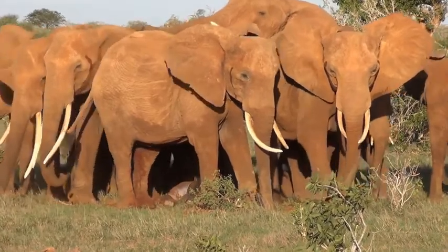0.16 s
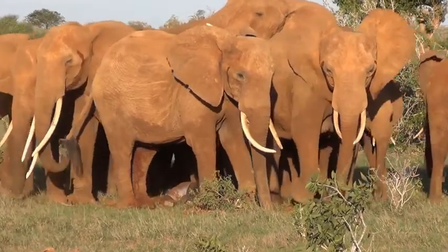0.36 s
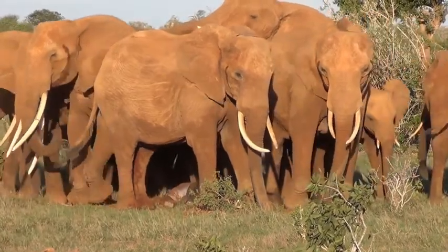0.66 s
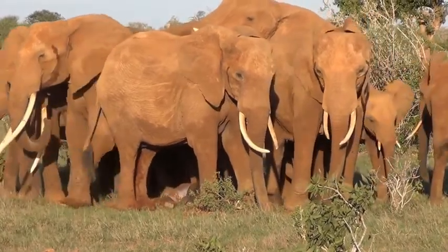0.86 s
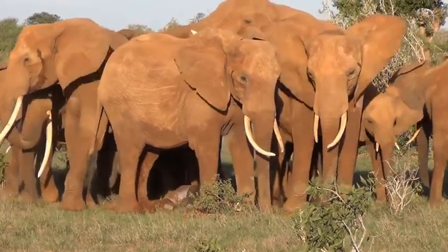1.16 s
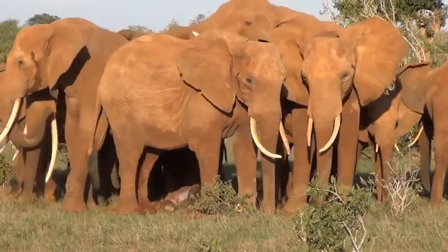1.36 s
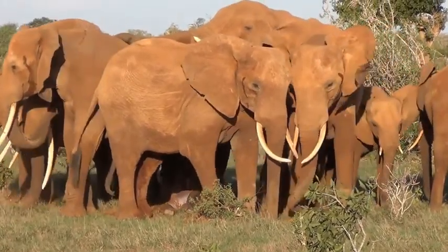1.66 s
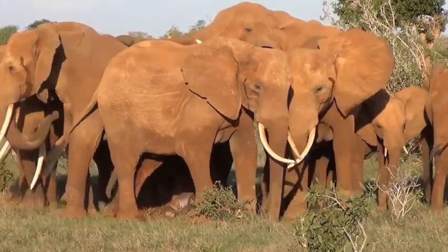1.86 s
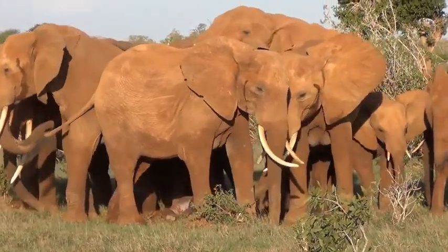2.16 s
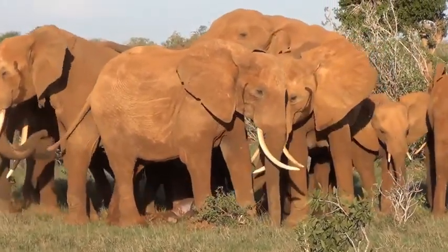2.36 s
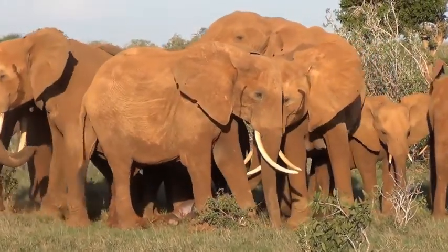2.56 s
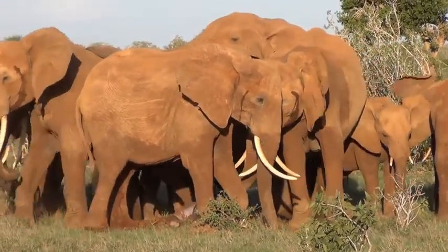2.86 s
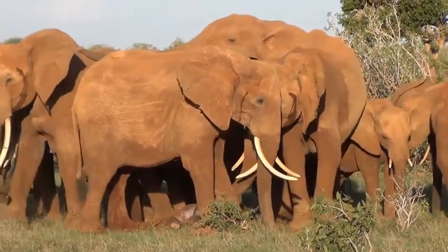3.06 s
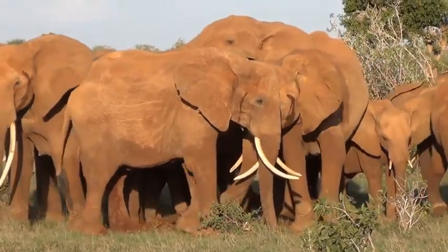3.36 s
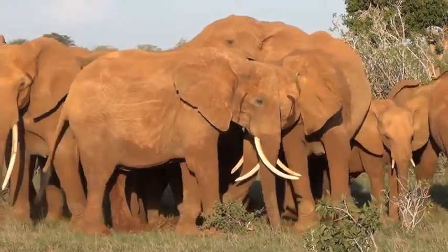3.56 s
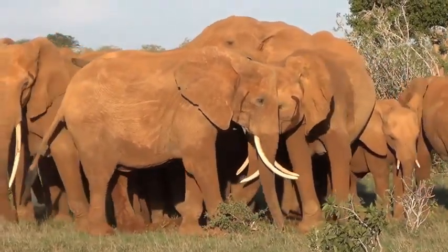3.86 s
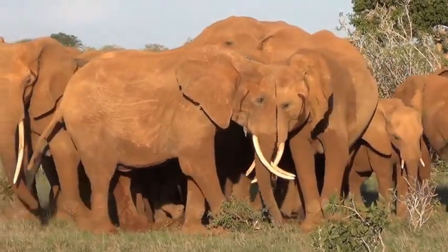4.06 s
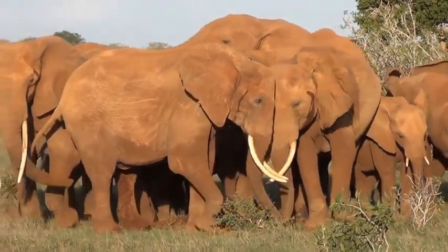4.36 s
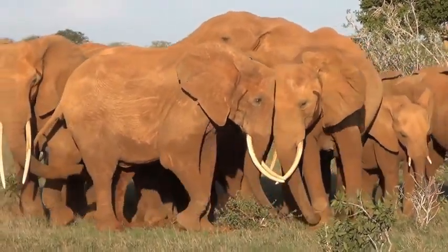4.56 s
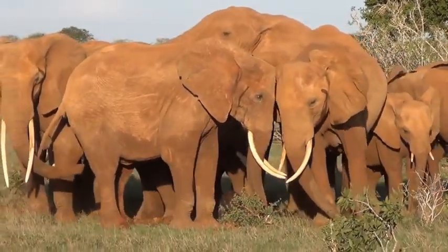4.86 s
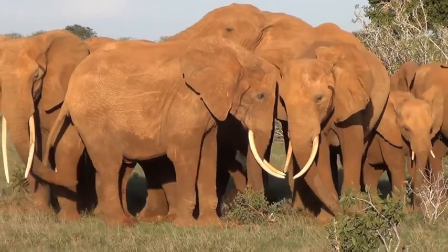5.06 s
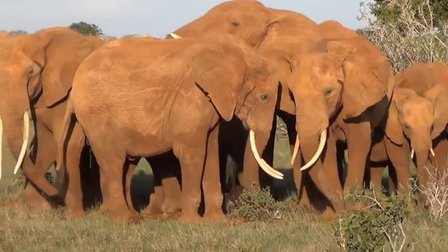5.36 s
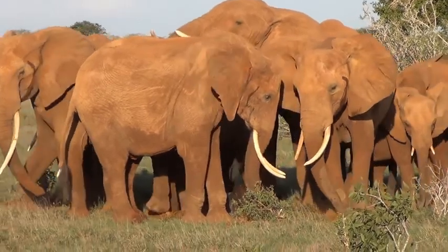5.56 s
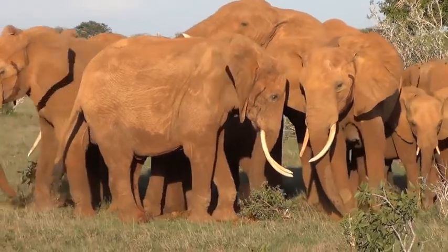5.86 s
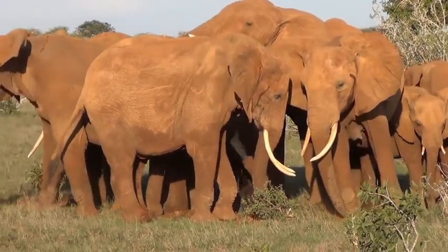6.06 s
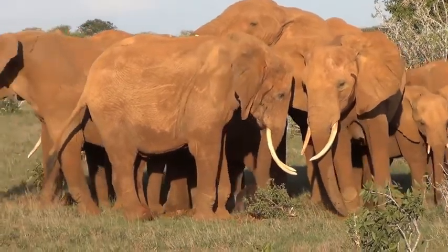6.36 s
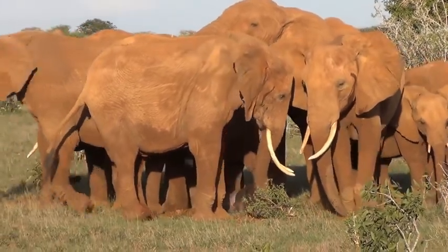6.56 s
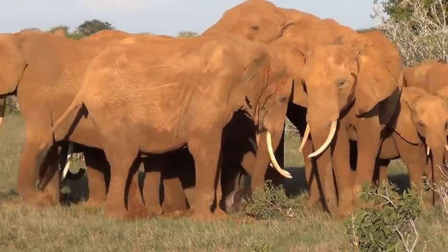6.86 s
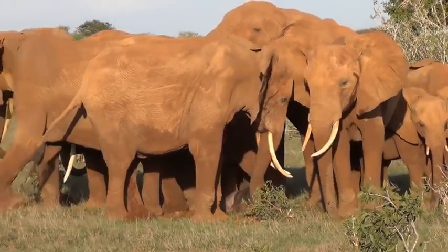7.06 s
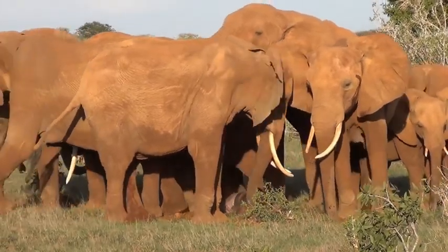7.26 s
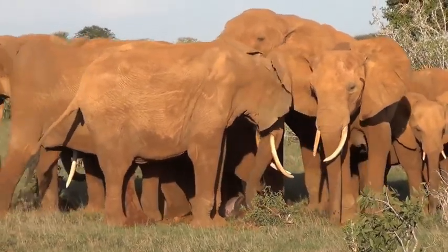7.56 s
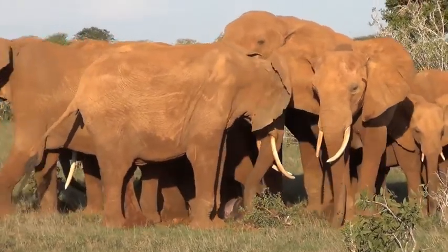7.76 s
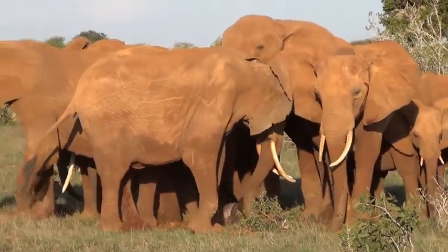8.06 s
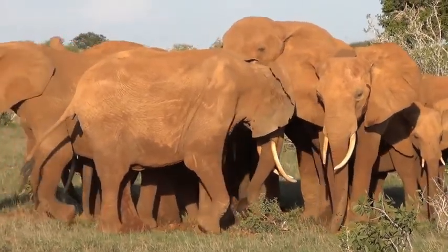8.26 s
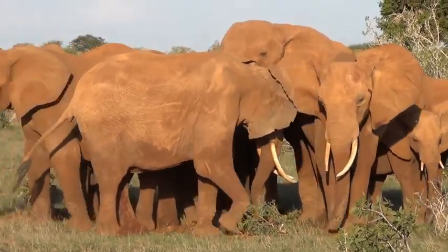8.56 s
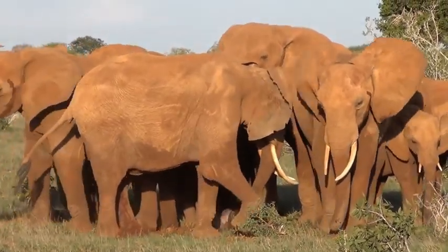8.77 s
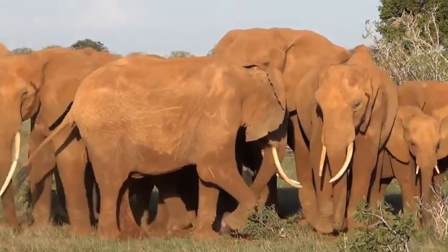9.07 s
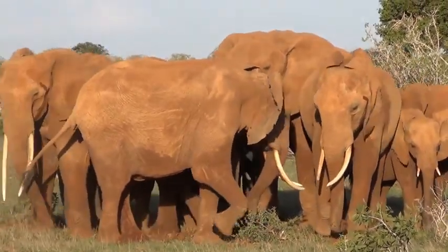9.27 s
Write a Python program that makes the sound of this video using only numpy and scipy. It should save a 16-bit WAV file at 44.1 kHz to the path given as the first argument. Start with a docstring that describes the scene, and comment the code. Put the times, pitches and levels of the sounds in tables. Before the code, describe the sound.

Outdoors in dry scrub, a herd of elephants shifts its feet near a small, almost mono microphone. Throughout, bush crickets trill very high, around 9 kHz, in rough pulsing bursts over a far chorus and steady hiss, with patchy grass rustle. Wind puffs start moderate and soon soften; a grassy swish, small twig ticks and a falling bird chirp come at 1.3-1.5 s. Sharp wind pops cluster from 2 to 3 s. Near 3.5 s the wind almost rests, and a faint breathy far whistle wavers until about 4.5. Gusts build, strongest from 4.9 to 7 s, with dense thudding, crackling pops, brisk bird notes at 5.2 and 5.6, and the loudest dry snap at 5.8. Another bird glides down at 6.5. Wind then eases, with a burst of pops near 8.1, quick chirps at 8.6, a twig snap at 8.8 and light crackles at 9.3, crickets still trilling.

```python
"""Open scrubland where a herd of elephants shifts its feet, heard by a small, nearly mono microphone.
From the start, bush crickets near 9 kHz (rough tones cut into wing strokes) trill over steady hiss, birds
whistle short gliding sines, gusts (coloured noise) and pops (ringing noise scraps) hit the microphone,
dry grass rustles (patchy noise, ticks) and twigs snap (dying noise). Near 3.5 s the wind almost rests and
a faint far whistle begins; from 4.9 to 7 s gusts, pops and snaps are strongest, then the wind eases."""
import sys
import numpy as np
from scipy import signal
from scipy.fft import rfft, irfft, next_fast_len
from scipy.io import wavfile
from scipy.ndimage import uniform_filter1d, map_coordinates

SR = 44100
rng = np.random.default_rng(int(sys.argv[2]) if len(sys.argv) > 2 else 0)


def wrap_up_sound(samples):
    """Save the sound to the file named by the first command line argument, as 16-bit audio."""
    columns = np.atleast_2d(samples).T
    # keep every value between -1 and 1, then stretch to whole-number steps
    tamed = np.clip(columns, -1, 1)
    steps = np.round(tamed * 32767).astype(np.int16)
    wavfile.write(sys.argv[1], SR, steps)


N = 415845
T = np.arange(N) / SR  # time of each sample, s

# In every (f/Hz, level/dB) colour table only the shape counts: the overall level is set elsewhere.
# gusts on the microphone, before lulls and random swing: (t/s, level/dB, upper against lower part/dB)
GUSTS = [(0.0, -58.5, -1), (0.29, -73, -10), (0.58, -74.5, -4), (0.86, -77.5, -8), (1.31, -84, 2),
         (1.7, -83, -4), (1.84, -72.5, -9), (2.13, -68, -3), (2.26, -68.5, -2), (2.7, -67, -8),
         (3.07, -74, -5), (3.52, -93, 10.5), (3.81, -74, -5), (3.96, -69.5, 0), (4.33, -66, -5),
         (4.54, -59.5, -6), (4.88, -51, -0.5), (5.14, -48.5, 0), (5.83, -49.5, 1), (6.17, -53.5, 1.5),
         (6.43, -60, -5.5), (6.62, -59, -4), (6.8, -52, -5), (6.96, -54, -2), (7.27, -60, -7.5),
         (7.62, -60, -7), (7.83, -66.5, -6), (7.96, -68.5, -4), (8.06, -58.5, -4), (8.19, -61, -7.5),
         (8.82, -68.5, -8), (8.95, -74, -16), (9.19, -77.5, 0), (9.43, -76.5, -9)]
# moments when the wind drops: (t/s, change of level/dB, half length/s)
LULLS = [(.42, -12, 0.026), (.62, -8, 0.025), (2.19, -21, 0.0086), (3.06, -6, 0.038), (4.26, -6, 0.12),
         (6.445, -15, 0.017), (6.56, -8, 0.034), (7.81, -16, 0.026), (9.08, -9, 0.054)]
# colour of the wind's lower part: (f/Hz, level/dB)
DULL_COLOUR = [(40, -67), (100, -45), (200, -13.5), (350, 0), (550, 1.5), (800, 1.5), (1300, -2.5),
               (2500, -44.5), (5000, -110)]
# colour of the wind's upper part: (f/Hz, level/dB)
BRIGHT_COLOUR = [(200, -66), (500, -20), (900, -12), (1300, -0.5), (2000, -4), (3000, -14), (5000, -32.5),
                 (9000, -40)]
# colour of the deepest buffeting: (f/Hz, level/dB)
RUMBLE_COLOUR = [(70, -30), (110, -11), (170, 0), (260, 2), (400, -24)]
# strong eddies bursting on the membrane, peak before ring and puff are mixed:
# (t/s, peak level/dB, centre f/Hz, push of wind against the peak/dB)
STRONG_POPS = [(0.017, -40.5, 1160, -17), (0.057, -56, 589, -26), (0.143, -39, 1050, -30),
               (0.306, -67, 1250, -24), (0.487, -46.5, 1260, -15), (0.527, -53, 869, -13),
               (0.689, -68, 2230, -32), (0.799, -48.5, 1020, -30), (0.834, -53, 2160, -20),
               (0.912, -51, 855, -11.5), (0.991, -61, 662, -11), (1.039, -65, 2230, -19),
               (1.213, -56.5, 1980, -15), (1.478, -57.5, 710, -32), (1.666, -51, 1110, -30),
               (1.697, -58, 1190, -14), (1.712, -51.5, 497, -10), (1.922, -42.5, 1210, -17.5),
               (1.963, -54.5, 891, -12.5), (2.029, -34, 1960, -17.5), (2.041, -21.5, 1410, -43),
               (2.099, -43, 885, -15), (2.127, -38, 1560, -47), (2.149, -40, 842, -24),
               (2.216, -45, 1440, -23), (2.285, -39, 1350, -25), (2.3, -46, 1450, -15),
               (2.411, -46, 1040, -26), (2.506, -45, 905, -26), (2.575, -40.5, 1030, -34),
               (2.609, -42, 880, -43), (2.641, -41, 690, -32), (2.73, -43, 1340, -15),
               (2.751, -37, 1420, -19), (2.851, -51, 1340, -19), (2.89, -55.5, 947, -17),
               (2.938, -58, 807, -18), (2.997, -54, 786, -14), (3.112, -48, 824, -22),
               (3.14, -40.5, 1080, -25), (3.418, -63, 2140, -13), (3.879, -49, 1310, -22),
               (4.065, -41, 2150, -50), (4.169, -59, 1370, -11), (4.353, -46, 767, -16),
               (4.403, -42, 1280, -16), (4.432, -36, 930, -21), (4.462, -41, 1450, -28),
               (4.507, -50, 600, -10), (4.569, -38, 1730, -24), (4.608, -40.5, 1480, -24),
               (4.624, -32.5, 1050, -28), (4.67, -29, 1590, -29), (4.687, -40.5, 1000, -26),
               (4.728, -46, 1240, -31), (4.787, -38, 950, -19), (4.799, -39, 999, -18),
               (4.875, -53, 641, -28), (4.925, -40, 608, -16), (4.963, -32, 1220, -42),
               (4.987, -39, 662, -28), (5.007, -25, 900, -25), (5.056, -21, 1370, -39),
               (5.098, -36, 734, -18), (5.151, -30.5, 920, -24), (5.203, -26, 1760, -26),
               (5.235, -31, 1420, -37), (5.262, -19, 1680, -42), (5.318, -21, 1570, -24),
               (5.343, -38, 729, -30), (5.417, -47, 1550, -34), (5.43, -47, 1380, -38),
               (5.451, -36, 912, -29), (5.465, -31.5, 1450, -26), (5.497, -30.5, 1410, -26),
               (5.53, -33, 970, -20), (5.551, -26, 830, -22), (5.573, -28, 1140, -21),
               (5.626, -26, 1750, -23), (5.662, -25.5, 1570, -30), (5.756, -40, 802, -25),
               (5.788, -28, 1200, -22), (5.823, -26, 1680, -25), (5.84, -23, 1400, -26),
               (5.885, -32.5, 956, -21), (5.923, -31, 1310, -20), (5.943, -34, 748, -34),
               (6.008, -37, 755, -18), (6.062, -42, 1930, -23), (6.08, -16.5, 1980, -36),
               (6.102, -39, 915, -28), (6.124, -43, 595, -25), (6.184, -46, 2050, -39),
               (6.203, -49, 1380, -35), (6.229, -38, 644, -15.5), (6.283, -35, 1120, -17),
               (6.324, -37.5, 1050, -16.5), (6.412, -46, 950, -21), (6.503, -36, 1440, -25),
               (6.62, -40, 1480, -22), (6.639, -38.5, 538, -13.5), (6.728, -30, 1400, -39),
               (6.802, -39, 1320, -26), (6.821, -32.5, 1250, -18), (6.882, -39, 867, -26),
               (6.932, -28.5, 1190, -36), (6.961, -34, 1170, -25), (7.025, -51, 549, -21),
               (7.107, -28, 1440, -57), (7.162, -47, 510, -14), (7.207, -37, 1060, -31),
               (7.29, -48.5, 910, -14), (7.382, -59, 510, -22), (7.42, -50, 1010, -15),
               (7.52, -36, 1050, -38), (7.551, -41, 991, -20), (7.578, -41, 1060, -29),
               (7.606, -38.5, 1230, -25), (7.628, -44.5, 1760, -11), (7.643, -43.5, 573, -12),
               (7.675, -41.5, 1040, -11), (7.712, -45, 746, -11), (7.753, -53.5, 1080, -9),
               (7.879, -51, 783, -9.5), (7.967, -46, 999, -13.5), (8.039, -31.5, 1550, -29),
               (8.103, -44, 1120, -12.5), (8.117, -33, 1890, -37), (8.131, -30.5, 1520, -24),
               (8.175, -45, 970, -13.5), (8.197, -45, 1100, -33), (8.232, -43.5, 977, -18),
               (8.263, -42, 826, -15.5), (8.347, -40, 970, -25), (8.408, -48, 1290, -10.5),
               (8.554, -51.5, 530, -14), (8.593, -51.5, 912, -8), (8.79, -50, 1070, -22),
               (8.81, -49, 1320, -29), (8.908, -52, 533, -17), (9.017, -53, 915, -16),
               (9.183, -57, 503, -29), (9.258, -48.5, 1150, -37), (9.387, -49.5, 1110, -18)]
# rustle of grass and leaves, before a fixed lift: (t/s, level/dB)
RUSTLE_LEVEL = [(0.0, -61.5), (0.71, -60), (1.02, -69), (1.52, -63.5), (2.18, -66), (4.62, -64.5),
                (5.07, -59), (6.72, -60.5), (7.8, -66.5), (7.98, -60.5), (9.06, -66.5), (9.43, -61.5)]
# a body sweeping through tall grass, before the same lift: (t of the peak/s, level/dB, half length/s)
SWISHES = [(0.77, -67, 0.016), (1.32, -55, 0.065), (4.207, -66.5, 0.1), (4.52, -59, 0.027),
           (5.45, -71, 0.013), (6.65, -67, 0.08), (7.887, -67.5, 0.061)]
# colour of the dry grass: (f/Hz, level/dB)
GRASS_COLOUR = [(1000, -40), (1700, -10), (3000, -6), (4500, -5.5), (5900, -1), (6800, -6.5), (8500, 5.5),
                (10500, -15.5), (14400, -28.5)]
# twigs and stalks breaking, peak before the two parts are mixed:
# (t/s, peak level/dB, centre f/Hz, time to fall 60 dB/ms, share of broad crack/0-1)
TWIG_SNAPS = [(0.4994, -47, 8060, 17, 0.35), (0.7694, -38, 7400, 13, 0.6), (1.3664, -37, 7850, 15, 0.66),
              (1.443, -41, 7960, 15, 0.7), (1.5087, -45, 8220, 13, 0.8), (1.759, -40, 4670, 14, 0.58),
              (2.4594, -43.5, 3470, 12, 0.73), (4.0647, -36, 2140, 15, 0.6), (4.2946, -35, 7750, 15, 0.4),
              (4.956, -30, 7830, 10, 0.36), (4.9706, -30, 7800, 12, 0.67), (5.0188, -26, 7900, 12.8, 0.35),
              (5.7919, -17.5, 7650, 19, 0.63), (5.8067, -23.5, 8100, 32, 0.5),
              (6.4038, -38, 7850, 5.5, 0.3), (6.4245, -36, 7800, 16, 0.66), (8.135, -36.5, 7800, 7.4, 0.95),
              (8.763, -31, 7560, 49, 0.38), (9.336, -40, 8000, 15, 0.4), (9.354, -35, 8200, 14, 0.6),
              (9.395, -40, 2970, 10, 0.6)]
# nearest bush crickets, level before roughness: (wing tone f/Hz, [(end of a trill t/s, level/dB)])
CRICKET_TRILLS = [(9000, [(.229, -58), (.787, -52.5), (1.305, -52.5), (1.853, -56), (2.374, -63),
                  (2.876, -55.5), (3.351, -50.5), (3.899, -49.5), (4.454, -60), (5.074, -48), (5.656, -56),
                  (6.158, -62), (6.714, -66), (7.244, -58), (7.793, -53.5), (8.338, -54.5), (8.858, -63),
                  (9.35, -49.5)]), (9060, [(.497, -56), (1.05, -57.5), (1.668, -54), (2.241, -71),
                  (2.838, -54), (3.351, -58), (3.899, -52), (4.378, -57), (4.825, -54.5), (5.366, -55),
                  (5.91, -51), (6.432, -51), (6.919, -55), (7.492, -49.5), (8.003, -55), (8.552, -54),
                  (9.059, -62)]), (8900, [(.5, -63), (1.42, -58), (2.241, -60.5), (2.933, -58),
                  (3.975, -51.5), (5.347, -57), (5.656, -59), (6.312, -53.5), (6.715, -48), (7.271, -51),
                  (8.82, -58), (9.33, -59)])]
# colour of the far crickets: (f/Hz, level/dB)
CHORUS_COLOUR = [(6500, -86), (7200, -9), (8000, -5.5), (8700, 9), (9200, 3), (9600, -54), (10500, -92)]
# bird notes, before resonance and flutter: (start t/s, length/s, first f/Hz, last f/Hz, level/dB)
BIRD_NOTES = [(0.447, 0.037, 2760, 2880, -64), (1.335, .04, 4020, 3980, -68),
              (1.376, .062, 4000, 2100, -60), (1.42, 0.034, 3560, 3540, -67),
              (1.435, 0.033, 2550, 2790, -68), (1.422, .04, 1765, 1775, -66), (1.578, .04, 2980, 2920, -69),
              (1.62, 0.032, 3200, 3180, -69.5), (2.874, 0.086, 4070, 4170, -66),
              (2.962, 0.058, 4060, 3200, -58.5), (3.264, 0.055, 2910, 2900, -69),
              (5.236, 0.037, 2570, 2880, -47.5), (5.276, 0.035, 3720, 3400, -58),
              (5.568, 0.049, 2520, 2900, -49.5), (5.615, 0.04, 3520, 3340, -59),
              (6.1, .035, 3170, 3160, -68), (6.11, 0.19, 4100, 4140, -68), (6.501, 0.12, 4190, 2040, -60),
              (8.375, .035, 2930, 2980, -68), (8.575, 0.051, 3300, 3080, -62),
              (8.598, 0.0093, 4500, 3400, -49), (8.614, .02, 2400, 2250, -66),
              (8.611, 0.042, 5200, 3270, -58), (8.861, .035, 3100, 2960, -69),
              (9.106, .04, 2880, 2770, -67), (9.19, 0.059, 3160, 2790, -68)]
# colour of the far air and the microphone's own noise: (f/Hz, level/dB)
HISS_COLOUR = [(18, -57), (30, -32), (82, -43), (418, -41), (840, -23), (1560, -19), (2070, -13.5),
               (6810, -11.5), (8810, -2), (10000, -12), (14400, -14.5)]
# colour of what differs between left and right, applied to the shared sound: (f/Hz, level/dB)
SIDE_COLOUR = [(60, -47), (240, 4), (940, -45), (3690, -43.5), (14600, -2.5)]

FLICKER_DB = 0.5  # size of the wind's random swing
BRIGHT_GROWS = 0.12  # dB of extra brightness per dB of that swing
RUMBLE_DB, RUMBLE_FOLLOWS = -86, 0.53  # middle level; share of the gust's swing it follows
PUSH_S, PUSH_BRIGHT_DB = 0.011, -7.5  # half length of a push; its upper part against its lower
# lesser eddies: average-size rate (before uneven gaps), peak over the wind, scatter, usual centre
SMALL_PER_S, SMALL_DB, SMALL_SPREAD_DB, SMALL_HZ = 85, 9, 4.5, 1350
SMALL_MAX = 1100  # most lesser eddies that can be drawn
TRILL_S, SWELL_S, STOP_S = 0.26, 0.14, 0.004  # trill length, slow start, quick stop
STROKES_PER_S = 51.5  # wing strokes
CHORUS_DB, CHORUS_SWING_DB = -61, 4  # far crickets: middle level, size of the random swing
BEAK_HZ, BEAK_WIDTH_HZ, BEAK_DB = 3400, 390, 5.5  # resonance that lifts bird notes crossing it
WHISTLE_S, WHISTLE_LENGTH_S = 3.65, 0.88  # start and length
WHISTLE_HZ, WHISTLE_END_HZ, WHISTLE_DB = 1360, 1410, -72  # pitch at the start and at the end of the glide; level before wavering
TOP_HZ = 14430  # upper limit of the sound kept


def wind():
    """Air tumbles over the microphone in short lumps of limited size; stronger swings are also brighter."""
    swing_db = FLICKER_DB * wobble(25)
    level_db = gust() + swing_db
    bright_db = curves(GUSTS)[1] + BRIGHT_GROWS * swing_db + 3 * wobble(25)
    # tanh keeps the random swings within bounds
    lumps = np.tanh(0.35 * wobble(70) + 0.45 * wobble(200))
    grain = np.tanh(0.36 * wobble(330))
    dull = coloured(amp(7.2 * lumps + 6 * grain) * rng.standard_normal(N), DULL_COLOUR)
    bright = coloured(amp(5 * lumps + 15.2 * grain) * rng.standard_normal(N), BRIGHT_COLOUR)
    rumble_db = RUMBLE_DB + RUMBLE_FOLLOWS * (level_db - level_db.mean()) + 3.5 * wobble(22)
    rumble = amp(rumble_db) * coloured(rng.standard_normal(N), RUMBLE_COLOUR)
    dull_level = amp(level_db) + push()
    bright_level = amp(level_db + bright_db) + amp(PUSH_BRIGHT_DB) * push()
    return dull_level * dull + bright_level * bright + rumble


def gust():
    """Strength of the wind in dB: the gusts with their brief lulls."""
    return curves(GUSTS)[0] + bumps(LULLS)


def push():
    """Each strong eddy carries a short swell of wind with it."""
    return bumps([(s, amp(db + low_db), PUSH_S) for s, db, hz, low_db in STRONG_POPS])


def pops():
    """Each eddy rings briefly at its own pitch inside a longer, ragged puff; the cover dulls the puff."""
    out, t = np.zeros(N + SR), np.arange(SR // 40) / SR
    rows = [row[:3] for row in STRONG_POPS] + small_pops()
    cover = signal.butter(2, 2200, fs=SR)
    puff_time = t / 0.0025
    noises = rng.standard_normal((len(STRONG_POPS) + SMALL_MAX, 2, len(t)))
    for (s, db, hz), noise in zip(rows, noises):
        ring_time = t * hz / 1.76  # higher pitches die sooner
        ring = burst(noise[0] * ring_time * np.exp(-ring_time ** 2), hz, width=0.56)
        steps_db = 6 * np.repeat(noise[0, ::40], 40)[:len(t)]  # a new gain every 40 samples
        ragged = noise[1] * puff_time * np.exp(-puff_time) * amp(steps_db)
        puff = burst(signal.lfilter(*cover, ragged), hz, width=1.87)
        out[round(s * SR):][:len(t)] += amp(db) * (0.7 * ring + 0.3 * puff)
    return out[:N]


def small_pops():
    """Lesser eddies come by chance and grow with the wind: rows of (t/s, peak level/dB, centre f/Hz)."""
    draw = rng.standard_normal((SMALL_MAX, 3))
    s = np.cumsum(np.exp(0.6 * draw[:, 0])) / SMALL_PER_S
    wind_db = 20 * np.log10(amp(gust() + curves(GUSTS)[1]) + push())
    scatter_db = SMALL_SPREAD_DB * np.clip(draw[:, 1], -2, 1.6)
    db = np.interp(s, T, wind_db) + SMALL_DB + scatter_db
    hz = SMALL_HZ * np.exp(0.31 * np.clip(draw[:, 2], -2, 2))
    return [row for row in zip(s, db, hz) if row[0] < N / SR]


def grass():
    """Dry stalks brush: patchy hiss with sparse small ticks, swelling where a body sweeps by."""
    level_db, = curves(RUSTLE_LEVEL)
    level = amp(level_db) + bumps([(s, amp(db), half) for s, db, half in SWISHES])
    ticks = (rng.random(N) < 0.004) * amp(3.3 * rng.random(N)) * rng.standard_normal(N)
    stalks = coloured(patchy(depth_db=3.5) + 0.41 * unit(ticks), GRASS_COLOUR)
    return amp(2.5) * level * stalks


def snaps():
    """A breaking stalk gives a sharp broad crack that dies at once, mixed with the stalk's own colour."""
    out, t = np.zeros(N + SR), np.arange(SR // 10) / SR
    noises = rng.standard_normal((len(TWIG_SNAPS), len(t)))
    for (s, db, hz, ms, broad), noise in zip(TWIG_SNAPS, noises):
        crack = noise * amp(-60 * t / (ms / 1000))
        wide = burst(crack, 5800, width=1.2)
        stalk = burst(crack, hz, width=0.16)
        out[round(s * SR):][:len(t)] += amp(db) * (broad * wide + (1 - broad) * stalk)
    return out[:N]


def crickets():
    """Wing strokes about 19 ms apart pulse a rough tone; trills swell and stop short over a far chorus."""
    near = np.zeros(N)
    for hz, trills in CRICKET_TRILLS:
        level = np.zeros(N)
        for end, db in trills:
            k = slice(max(0, round((end - TRILL_S) * SR)), round(end * SR))
            left = end - T[k]  # time until the trill ends
            strokes = np.sin(np.pi * np.clip(left * STROKES_PER_S % 1 / 0.71, 0, 1))
            edges = np.clip(np.minimum(left / STOP_S, (TRILL_S - left) / SWELL_S), 0, 1)
            level[k] += amp(db) * strokes * edges
        rough_hz = hz + 40 * wobble(300) + 15 * wobble(4)
        near += level * amp(0.97 * wobble(60)) * tone(rough_hz)
    far = coloured(amp(2.5 * wobble(90)) * patchy(depth_db=1.8), CHORUS_COLOUR)
    return near + amp(CHORUS_DB + CHORUS_SWING_DB * wobble(4)) * far


def birds():
    """Notes glide steadily in pitch, loudest mid-note or near a resonance; moving air makes them flutter."""
    out, waver_hz = np.zeros(N), 45 * wobble(90)
    for s, length, first_hz, last_hz, db in BIRD_NOTES:
        k = slice(round(s * SR), round((s + length) * SR))
        u = np.abs(T[k] - s) / length  # 0 to 1 through the note
        hz = first_hz + (last_hz - first_hz) * u
        beak_db = BEAK_DB * np.exp(-((hz - BEAK_HZ) / BEAK_WIDTH_HZ) ** 2)
        shape = np.abs(np.sin(np.pi * u)) ** 0.8
        out[k] += amp(db + beak_db) * shape * tone(hz + waver_hz[k])
    return out * amp(4.5 * np.tanh(wobble(130)))


def whistle():
    """A faint, breathy far whistle: a sine with shaky pitch and level that rises a little."""
    hz = np.interp(T, [WHISTLE_S, WHISTLE_S + WHISTLE_LENGTH_S], [WHISTLE_HZ, WHISTLE_END_HZ])
    level = amp(WHISTLE_DB) * arch(WHISTLE_S, WHISTLE_LENGTH_S) * amp(2.9 * wobble(60))
    return level * tone(hz + 35 * wobble(120))


def hiss():
    """Far air and the microphone's own noise form a steady floor of coloured noise."""
    return amp(-59) * coloured(rng.standard_normal(N), HISS_COLOUR)


def amp(db):
    """Turn dB into gain."""
    return 10 ** (np.asarray(db) / 20)


def unit(x):
    """Bring x to an average strength (rms) of 1."""
    return x / np.sqrt(np.mean(x ** 2) + 1e-20)


def curves(rows):
    """Join table rows by straight lines: one curve for each column after the time."""
    s, *cols = np.transpose(rows)
    return [np.interp(T, s, c) for c in cols]


def wobble(rate):
    """A smooth random curve through `rate` random points a second."""
    return map_coordinates(rng.standard_normal(N // 20), [T * rate])


def bumps(rows):
    """A sum of bell shapes from rows of (t/s, height, half length/s)."""
    out = np.zeros(N)
    for s, height, half in rows:
        k = slice(max(0, round((s - 3 * half) * SR)), round((s + 3 * half) * SR))
        out[k] += height * np.exp(-((T[k] - s) / half) ** 2)
    return out


def arch(start, length):
    """0 outside a span, half a sine wave inside it."""
    return np.sin(np.pi * np.clip((T - start) / length, 0, 1))


def coloured(x, points):
    """Shape x by a colour table of (f/Hz, level/dB), then bring it to rms 1."""
    m = next_fast_len(N + 8192)  # spare room at the end
    f, db = np.transpose(points)
    log_f = np.log(np.fft.rfftfreq(m, 1 / SR) + 1)
    gain = amp(np.interp(log_f, np.log(f + 1), db, left=-120, right=-120))
    return unit(irfft(rfft(x, m) * gain, m)[:N])


def patchy(depth_db):
    """White noise with soft patches of random gain in time and pitch."""
    z = signal.stft(rng.standard_normal(N), nperseg=512)[2]
    field = uniform_filter1d(rng.standard_normal(z.shape), size=6, axis=0)
    field = uniform_filter1d(field, size=10, axis=1)
    return signal.istft(z * amp(depth_db * unit(field)), nperseg=512)[1][:N]


def burst(noise, hz, width):
    """A scrap of noise sent twice through a resonance (width is a share of hz), peak 1."""
    b, a = signal.iirpeak(hz, 1 / width, SR)
    x = signal.lfilter(b, a, signal.lfilter(b, a, noise))
    return x / np.max(np.abs(x))


def tone(hz):
    """A sine that follows a pitch curve, rms 1."""
    return np.sqrt(2) * np.sin(2 * np.pi * np.cumsum(hz) / SR)


def scene():
    """Both channels carry nearly the same sound; a very faint, flickering difference sets them apart."""
    mid = wind() + pops() + grass() + snaps() + crickets() + birds() + whistle() + hiss()
    side = amp(-84) * coloured(wobble(30) * mid, SIDE_COLOUR)
    return np.array([mid + side, mid - side])


def record(dry):
    """Keep nothing above the upper band limit."""
    return irfft(rfft(dry) * (np.fft.rfftfreq(N, 1 / SR) < TOP_HZ), N)


dry = scene()
out = record(dry)
wrap_up_sound(out)
```